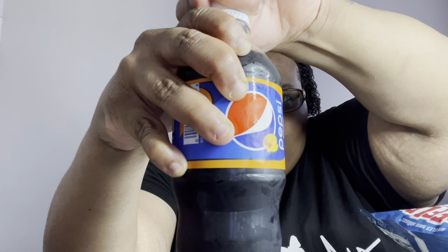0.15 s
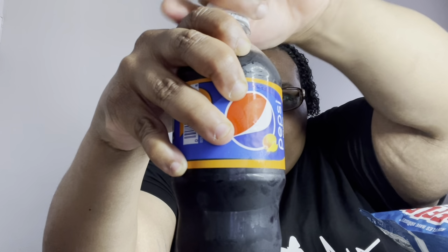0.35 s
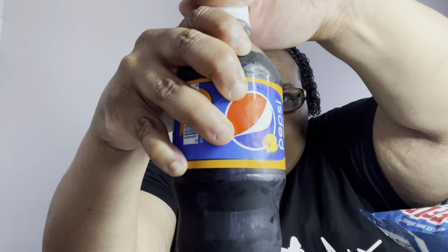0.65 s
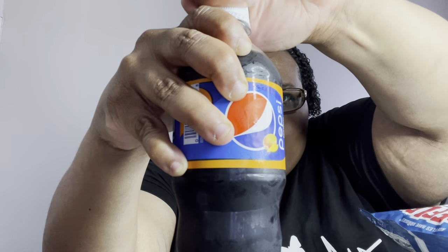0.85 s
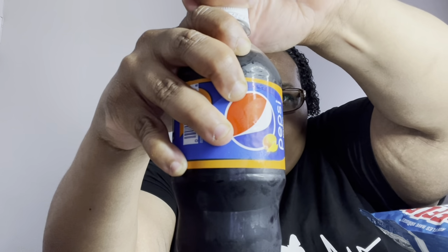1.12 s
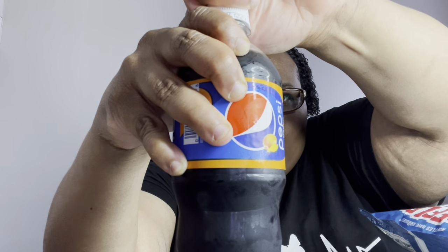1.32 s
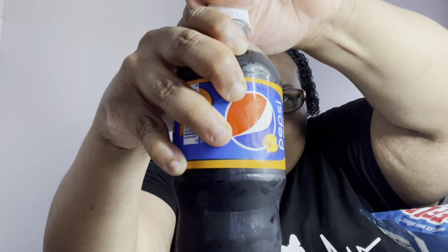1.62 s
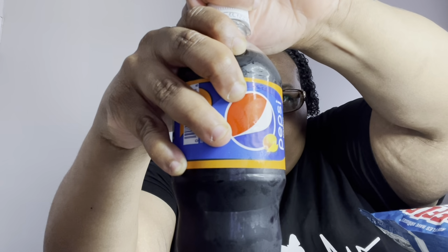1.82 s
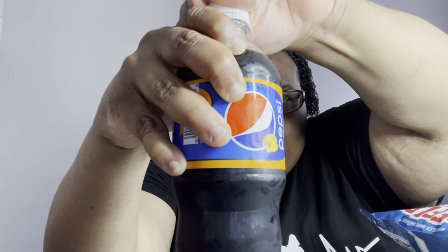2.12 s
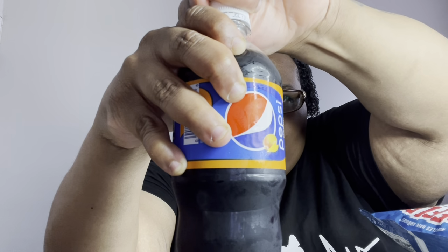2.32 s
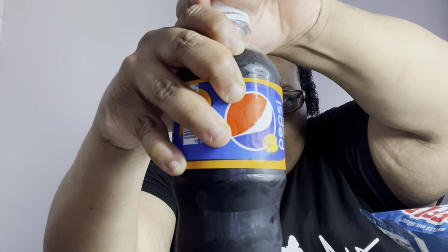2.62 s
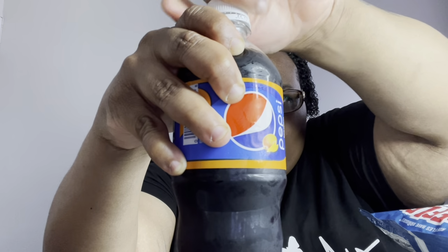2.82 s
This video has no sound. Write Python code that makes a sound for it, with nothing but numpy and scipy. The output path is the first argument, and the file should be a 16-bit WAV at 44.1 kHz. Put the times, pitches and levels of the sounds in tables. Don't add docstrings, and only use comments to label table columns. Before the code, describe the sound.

Close up, a soda bottle leaks a sharp, bright hiss while its cap is twisted; two dull early thumps, growing crackle and surges, a short squeal, then faint scraping over low indoor rumble.

```python
import sys
import numpy as np
from scipy import signal
from scipy.fft import rfft, irfft, next_fast_len
from scipy.io import wavfile
from scipy.ndimage import uniform_filter1d

SR = 44100
rng = np.random.default_rng(int(sys.argv[2]) if len(sys.argv) > 2 else 0)


def materialize(psi):
    bounded = np.clip(np.atleast_2d(psi).T, -1, 1)
    quanta = np.round(bounded * 32767).astype(np.int16)
    wavfile.write(sys.argv[1], SR, quanta)


def elevation(decibels):
    levels = np.asarray(decibels, float)
    return 10 ** (levels / 20)


N = 130095
TIME_S = np.arange(N) / SR
LEFT_RIGHT = np.array([[1], [-1]])


def unit(x):
    return x / np.sqrt(np.mean(x ** 2))


def band(x, hz, width_hz):
    b, a = signal.iirpeak(hz, hz / width_hz, SR)
    return signal.lfilter(b, a, x)


def above(x, hz):
    return signal.sosfilt(signal.butter(5, hz, "high", fs=SR, output="sos"), x)


def walk(rate_hz):
    hold = int(SR / rate_hz)
    steps = np.repeat(rng.standard_normal(N // hold + 1), hold)
    return 1.32 * uniform_filter1d(uniform_filter1d(steps, hold), hold)[:N]


def curve(table, column):
    rows = np.array(table, float)
    return np.interp(TIME_S, rows[:, 0], rows[:, column])


def gate(start_s, length_s, edge_s):
    inside_s = np.minimum(TIME_S - start_s, start_s + length_s - TIME_S)
    return np.clip(inside_s / edge_s + .5, 0, 1)


def puffs(clicks, decay_s):
    envelope = signal.lfilter([1], [1, -np.exp(-1 / (decay_s * SR))], clicks)
    return envelope * rng.standard_normal(N)


def cavities(x, table, flicker_db):
    out = 0
    for k, (hz, width_hz, db) in enumerate(table):
        out = out + (-1) ** k * elevation(db + flicker_db * walk(18)) * band(x, hz, width_hz)
    return out


# (time [s], level [dB], neck re leak [dB], open jet re leak [dB], spitting foam re leak [dB])
LEAK = [(0, -57, 5.5, -17, -13), (.2, -56, 2, -23, 2.5), (.37, -55, -2.5, -10, -3.5),
        (.41, -65, 3, 1.5, -7.5), (.6, -60.5, -0.5, -9, -13), (.68, -56, -1.5, -7.5, -4),
        (1.08, -53.5, -1.5, -8.5, -8.5), (1.52, -52.5, 1.5, -10.5, 0.5), (1.58, -47, -2, -12, 0),
        (1.9, -43, -7, -19, -2), (2.09, -47.5, -2.5, -16, -0.5), (2.13, -58, 1, -12.5, 5.5),
        (2.32, -51.5, -2.5, -9, -6.5), (2.42, -48.5, 1, -3, 2), (2.575, -41, -3.5, -11, -5.5),
        (2.595, -57.5, 0, -19, 11), (2.7, -55, 10.5, -7, -29), (2.95, -64, 11.5, -4.5, -24)]
# (frequency [Hz], width [Hz], level [dB])
THREAD = [(7240, 1060, -3), (8450, 930, -0.5), (10415, 690, -6.5)]
NECK = [(2800, 617, -2.5), (4410, 2330, -7), (5227, 587, 0)]
JET = [(12370, 1010, -0.5), (13280, 3900, -3), (15400, 1470, -3)]


def leak():
    spits_per_s, spit_spread_db, spit_most_db, spit_decay_s = 800, 5, 7, 0.0005
    surge_db, flicker_db = 0.52, 1
    chance = rng.random((2, N))
    spit_db = np.minimum(-spit_spread_db * np.log(1 - chance[1]), spit_most_db)
    spits = (chance[0] < spits_per_s / SR) * elevation(spit_db)
    foam = elevation(curve(LEAK, 4)) * unit(puffs(spits, spit_decay_s))
    turbulence = elevation(surge_db * walk(40.43)) * rng.standard_normal(N)
    gas = above(turbulence + foam, 2130)
    thread = -elevation(2.5) * unit(cavities(gas, THREAD, flicker_db))
    neck = elevation(1.5 + curve(LEAK, 2)) * unit(cavities(gas, NECK, flicker_db))
    jet = elevation(5 + curve(LEAK, 3)) * unit(cavities(gas, JET, flicker_db))
    return (thread + neck + jet) * elevation(curve(LEAK, 1))


# (time [s], peak [dB], neck re peak [dB])
POPS = [(.2197, -40, -12), (.2223, -39, -6), (.2241, -32, -10), (.253, -30, -8), (.2545, -37, 5),
        (1.1242, -40, -15), (1.1755, -40, -15), (1.1802, -40, -18), (1.1851, -38, -10), (1.1938, -40, -11),
        (1.2541, -37, -17), (1.2607, -37, -12), (1.2828, -38, -13), (1.2894, -36, -13), (1.2929, -36, -9),
        (1.3073, -38, -13), (1.3242, -31, -14), (1.3321, -39, -16), (1.4111, -38, -9), (1.4173, -33, -6),
        (1.4188, -34, -7), (1.4236, -35, -11), (1.4394, -39, -11), (1.4517, -29, -15), (1.4625, -35, -7),
        (1.4643, -37, -7), (1.4713, -33, -17), (1.4822, -33, -13), (1.4902, -33, -16), (1.5129, -38, -14),
        (1.5601, -33, -10), (1.5738, -30, -13), (1.5897, -32, -15), (1.5963, -34, -8), (1.6102, -32, -8),
        (1.6605, -33, -8), (1.7507, -32, -14), (1.7551, -31, -21), (1.8117, -31, -15), (1.8493, -23, -22),
        (1.8613, -30, -10), (1.8936, -30, -7), (2.0044, -29, -7), (2.0736, -32, -9), (2.0854, -31, -9),
        (2.1787, -25, -9), (2.1802, -35, -5), (2.1816, -39, -8), (2.1882, -34, -17), (2.196, -30, -11),
        (2.1977, -37, -12), (2.3422, -34, -13), (2.3677, -31, -10), (2.3693, -22, -17), (2.3714, -35, -4),
        (2.407, -34, -7), (2.4612, -32, -9)]


def pops():
    pop_db, neck_gain_db, jet_db, spray_db, spray_decay_s = 23, 3.5, -7.5, -15.5, 0.0014
    clicks = np.zeros((2, N))
    for s, db, neck_db in POPS:
        clicks[0, int(s * SR)] = elevation(db + pop_db)
        clicks[1, int(s * SR)] = elevation(db + pop_db + neck_gain_db + neck_db)
    high, low = (above(c + elevation(spray_db) * puffs(c, spray_decay_s), 2050) for c in clicks)
    thread = band(cavities(high, THREAD, 0), 8250, 2700)
    return cavities(low, NECK, 0) - thread + elevation(jet_db) * cavities(high, JET, 0)


def whistle(table, wobble):
    hz = curve(table, 1) * (1 + wobble * walk(500))
    level = elevation(curve(table, 2) + 1.34 * walk(250))
    tone = np.sqrt(2) * np.sin(2 * np.pi * np.cumsum(hz) / SR) * level
    start_s, end_s = table[0][0], table[-1][0]
    return tone * gate(start_s, end_s - start_s, 0.0045)


# (time [s], pitch [Hz], level [dB])
SQUEAL = [
    (2.585, 8740, -30),
    (2.589, 8600, -40),
    (2.627, 8340, -35),
    (2.635, 8030, -39.5),
    (2.653, 8430, -39),
    (2.66, 7950, -61),
]


def squeal():
    return whistle(SQUEAL, 0.017)


# (time [s], pitch [Hz], level [dB])
PEEP = [
    (2.72, 9220, -61),
    (2.8, 9080, -57),
    (2.85, 8900, -54),
    (2.858, 8600, -59),
    (2.886, 8100, -62),
    (2.905, 7850, -68),
]


def peep():
    return whistle(PEEP, 0.002)


def scuffs(table, width, edge, rough_db, loose):
    out = np.zeros((2, N))
    rough = elevation(rough_db * np.array([walk(90), walk(24.97)]))
    for s, length_s, hz, db in table:
        a, b = max(int((s - length_s) * SR), 0), min(int((s + 2 * length_s) * SR), N)
        noise = rng.standard_normal((2, N))[:, a:b]
        mid, side = unit(band(band(noise, hz, width * hz), hz, width * hz))
        shape = elevation(db) * gate(s, length_s, edge * length_s)[a:b] * rough[int(hz < 2500), a:b]
        out[:, a:b] += shape * (mid + loose * side * LEFT_RIGHT)
    return out


# (time [s], length [s], pitch [Hz],
# level [dB])
RUBS = [(2.333, .012, 3200, -49), (2.461, .014, 3210, -47), (2.556, .03, 5310, -47),
        (2.664, .008, 5350, -49), (2.716, .045, 5060, -46), (2.755, .07, 4800, -48),
        (2.775, .055, 3960, -49), (2.721, .085, 2850, -52), (1.521, .01, 2810, -55),
        (1.611, .02, 2810, -54), (.301, .065, 7010, -54), (.16, .07, 5100, -54), (2.70, .045, 3720, -53),
        (2.81, .13, 3150, -57), (2.675, .01, 5450, -49), (2.78, .05, 4540, -53), (2.86, .06, 3960, -55),
        (2.925, .03, 3680, -56), (2.475, .012, 2750, -50), (2.54, .02, 8100, -46), (.02, .34, 15500, -60),
        (.352, .004, 2400, -52), (.347, .004, 4700, -52), (.187, .005, 5100, -50), (.01, .3, 3450, -66),
        (2.61, .33, 3450, -61), (1.64, .42, 5500, -53), (2.83, .11, 4900, -56)]


def rubs():
    return scuffs(RUBS, width=.07, edge=.25, rough_db=2, loose=.6)


# (time [s], length [s], pitch
# [Hz], level [dB])
GRIP = [(0.019, 0.17, 212, -62.5), (0.25, 0.027, 110, -52), (0.28, 0.14, 690, -65.5),
        (.354, .007, 680, -49), (0.438, 0.29, 150, -63), (0.597, 0.01, 850, -61), (0.56, 0.17, 422, -64),
        (1.46, 0.41, 59, -62.5), (2.2, 0.27, 64, -57), (2.366, 0.0073, 1019, -61), (0.29, 0.14, 263, -63),
        (1.95, 0.52, 300, -69), (0.61, .18, 69, -61.5), (2.4, .25, 1000, -70), (.252, 0.0072, 2460, -58),
        (2.69, .25, 1040, -63), (2.701, 0.13, 108, -55), (2.804, 0.026, 690, -58.5),
        (2.859, 0.074, 64, -58), (1.62, .16, 1000, -73)]


def grip():
    return scuffs(GRIP, width=0.55, edge=0.36, rough_db=3, loose=0.41)


# (time [s], peak [dB], pitch [Hz], damped after [s])
THUMPS = [
    (0.2853, -36.5, 84, 0.056),
    (0.3642, -33, 87.8, 0.055),
    (0.557, -49.5, 78, 0.072),
]


def thumps():
    t60_s, edge_s = 0.2, 0.0068
    out = 0
    for s, db, hz, damped_s in THUMPS:
        since_s = TIME_S - s
        swing = np.sin(2 * np.pi * hz * since_s)
        out = out - elevation(db - 60 * np.maximum(since_s, 0) / t60_s) * swing * gate(s, damped_s, edge_s)
    return out


# (frequency [Hz], width [Hz], level [dB])
LOOSE = [(2170, 3600, 2.5), (4030, 1800, 6), (6600, 340, -3), (10000, 12500, 0.5)]
# (frequency [Hz], width [Hz])
LOOSE_GAPS = [(3380, 1100), (10200, 1200)]


def reflections(bottle):
    decay_s = np.array([[.005], [0.016], [0.016]])
    common_db, loose_db, gap_depth = -13, -6, .8
    tails = rng.standard_normal((3, 2048)) * np.exp(-np.arange(2048) / (decay_s * SR))
    tails /= np.sqrt(np.sum(tails ** 2, axis=1, keepdims=True))
    echo = [signal.fftconvolve(bottle, tail)[:N] for tail in tails]
    loose = cavities(np.array(echo[1:]), LOOSE, 0)
    for hz, width_hz in LOOSE_GAPS:
        loose = loose - gap_depth * band(loose, hz, width_hz)
    return elevation(common_db) * echo[0] + elevation(loose_db) * loose


# (frequency [Hz], density [dB per Hz])
ROOM = [(15, -47), (25, -45), (59, 3.5), (171, -5), (214, -5.5), (320, -2.5), (350, -15.5), (1260, -32),
        (2000, -61), (2600, -53), (4400, -120)]
# (frequency [Hz], width [Hz], level [dB])
ROOM_MODES = [(229, 20, -13), (285, 16, -21.5), (352.7, 8.5, -9.5), (421.4, 12, -17.5)]


def room():
    room_db, swell_db, loose_hz = -59, 3.5, 560
    rumble, rows = 0, np.array(ROOM)
    for hz in 30 * 2 ** np.arange(0, 6.2, .5):
        mid, side = (unit(band(band(rng.standard_normal(N), hz, hz / 2), hz, hz / 2)) for _ in range(2))
        density_db = np.interp(np.log(hz), np.log(rows[:, 0]), rows[:, 1])
        db = density_db + 10 * np.log10(hz) + swell_db * walk(4.36)
        share = min(hz / loose_hz, .7)
        rumble = rumble + elevation(db) * (mid + share * side * LEFT_RIGHT) / np.hypot(1, share)
    modes = 0
    for hz, width_hz, db in ROOM_MODES:
        modes = modes + elevation(db) * unit(band(rng.standard_normal((2, N)), hz, width_hz))
    return (unit(rumble) + modes) * elevation(room_db)


# (frequency [Hz], left leads [rad])
PORTS = [(200, 0), (550, -2.3), (1200, -2.7), (1800, .3), (2600, 2.3), (3100, 3), (3700, 3.3), (4400, 4.8),
         (6200, 4.9), (6500, 8.4), (8400, 6.28), (10100, 3.14), (11900, .2), (12500, -.1), (14300, -3.14),
         (15900, -6), (16500, -6.4)]


def ports(air):
    lift_db, lift_hz, sway_samples = 3.5, 190, 0.18
    size = next_fast_len(N)
    hz = np.arange(size // 2 + 1) * SR / size
    phase = np.interp(hz, *np.array(PORTS).T)
    right = elevation(lift_db / (1 + (hz / lift_hz) ** 2)) * np.exp(-1j * phase)
    far = irfft(rfft(air[1], size) * right, size)[:N]
    return np.array([air[0], far + sway_samples * walk(3.98) * np.gradient(far)])


def scene():
    bottle = leak() + pops() + squeal() + peep()
    air = bottle + reflections(bottle) + rubs() + grip() + thumps() + room()
    return ports(air)


def roll_off(x):
    return signal.sosfilt(signal.butter(12, 16950, fs=SR, output="sos"), x)


def record(dry):
    low_cut = signal.butter(2, 44.6, "high", fs=SR, output="sos")
    top_cut = signal.ellip(8, .2, 70, 15680, fs=SR, output="sos")
    mix = signal.sosfilt(top_cut, signal.sosfilt(low_cut, dry))
    return roll_off(mix)


dry = scene()
out = record(dry)
materialize(out)
```